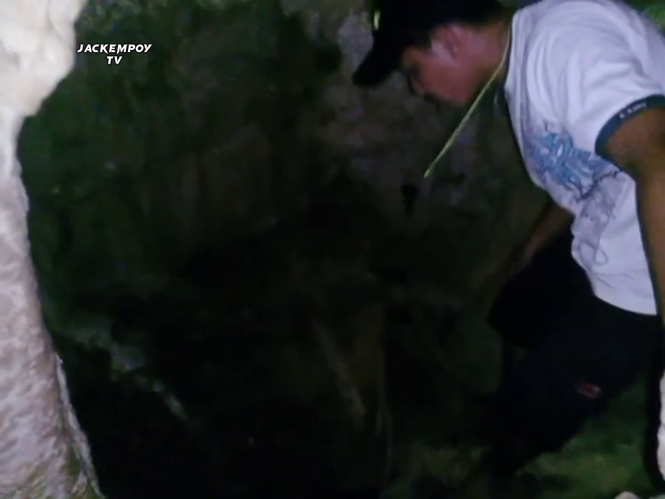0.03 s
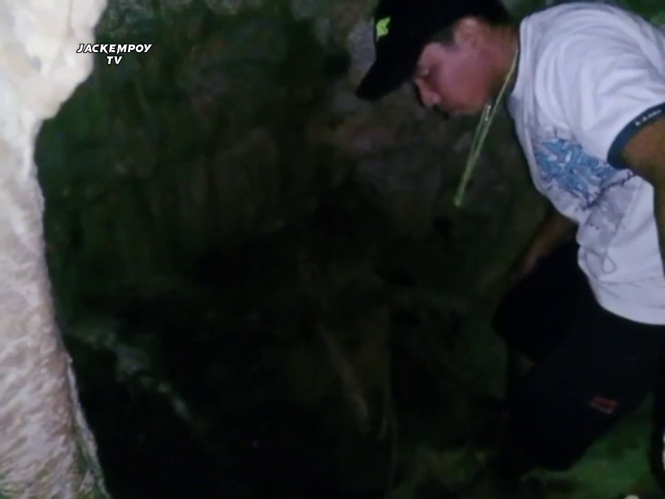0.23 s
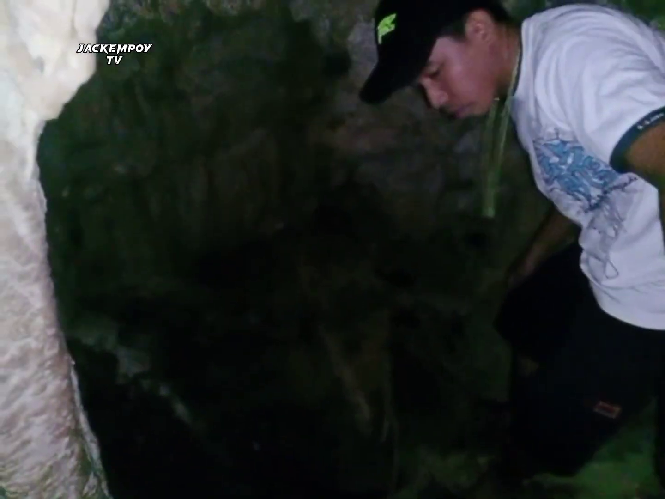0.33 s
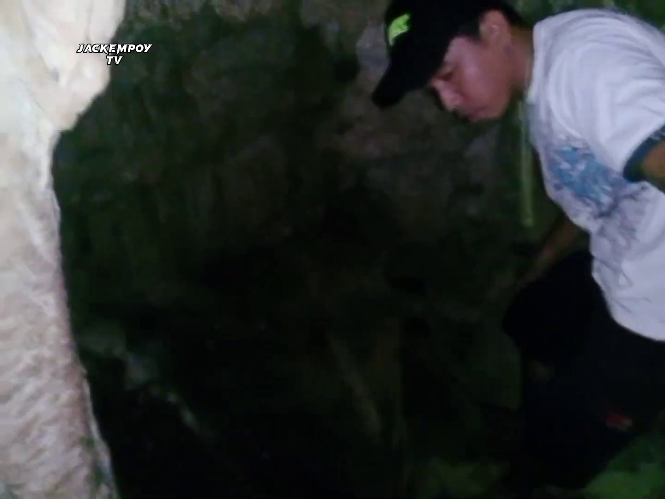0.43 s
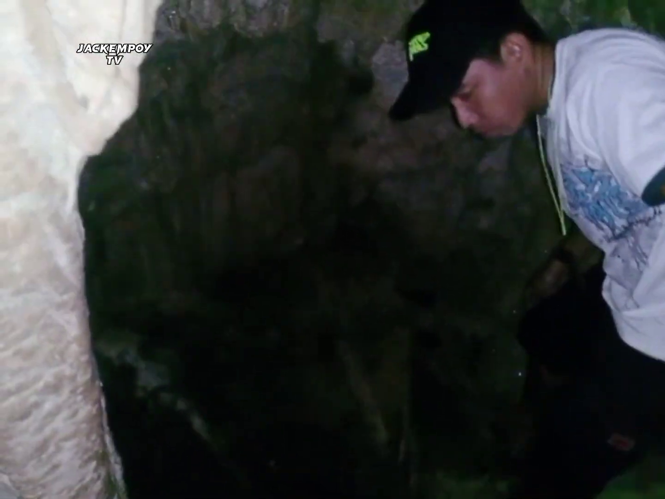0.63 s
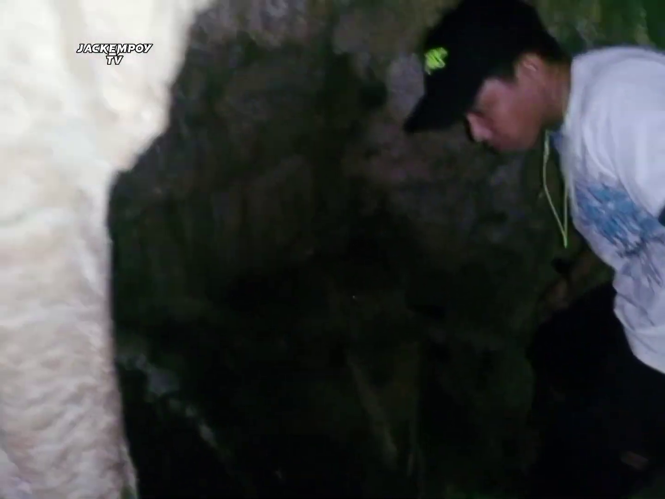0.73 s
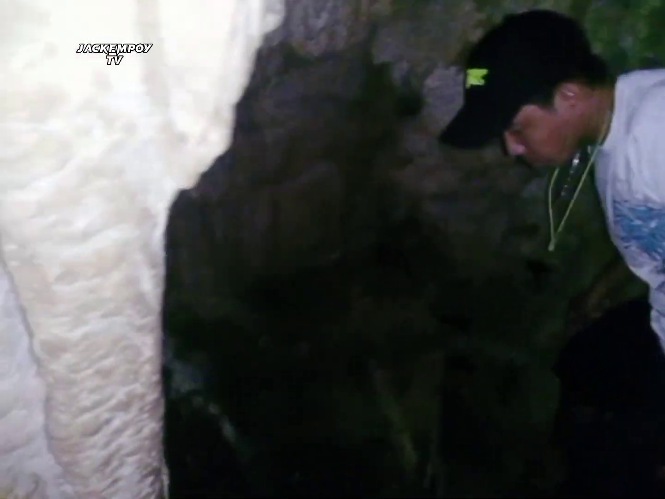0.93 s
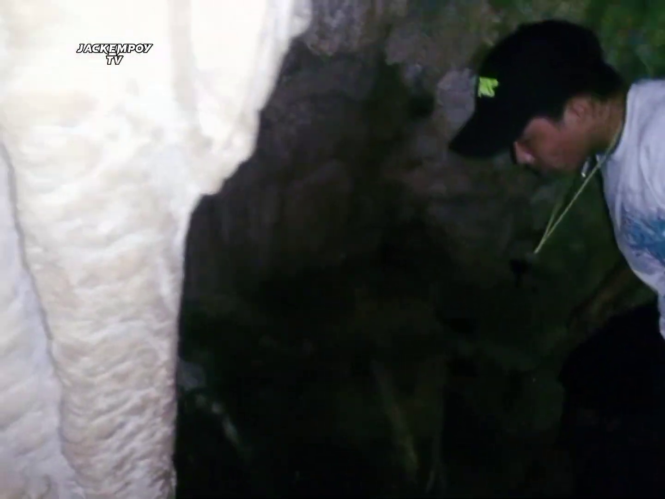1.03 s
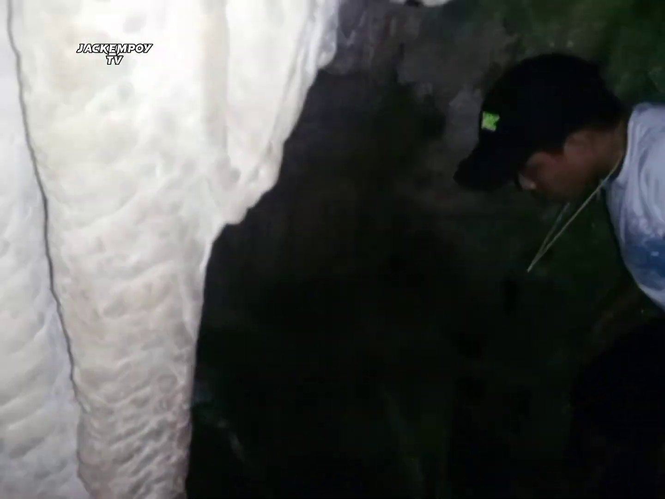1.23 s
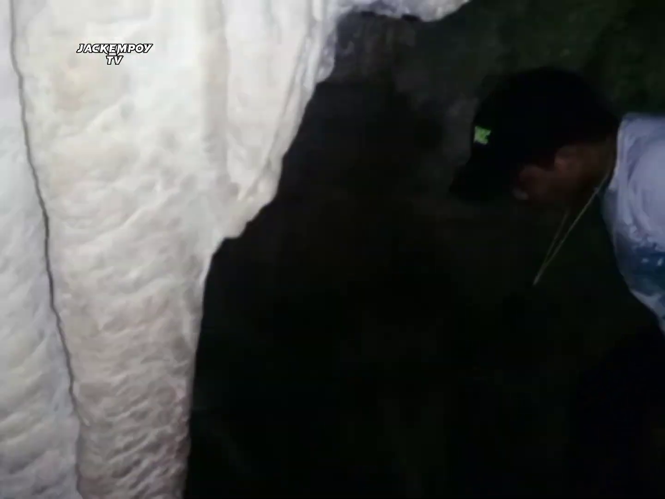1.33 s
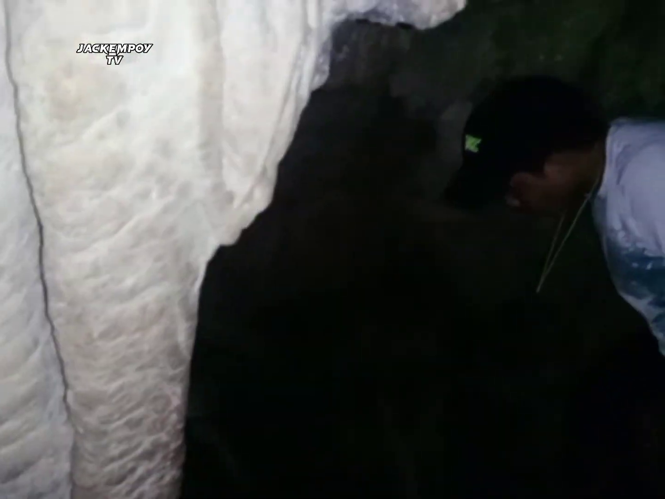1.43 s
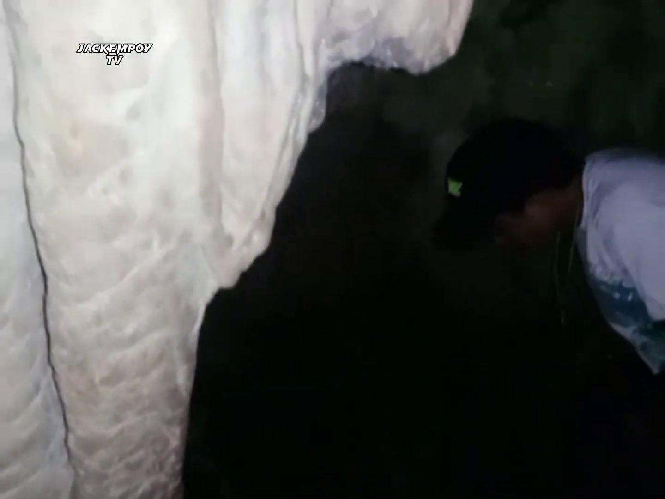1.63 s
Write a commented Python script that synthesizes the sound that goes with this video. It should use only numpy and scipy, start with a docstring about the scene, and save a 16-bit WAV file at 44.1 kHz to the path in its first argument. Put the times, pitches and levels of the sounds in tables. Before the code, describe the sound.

One dull bump booms hollowly with a short low rumble, then a few faint padded knocks follow. Throughout, a damp cave hisses steadily with distant running water and a shrill insect chorus.

```python
"""One dull bump sets a nearby hollow body booming until it is damped, with a short low rumble behind it.
A few faint, padded bumps follow. All around is the steady hiss of a damp cave: distant running water,
with a shrill chorus of insects and a thin, high hiss on top. The boom is a set of tones rung by soft
pushes; the water, insects, high hiss and rumble are shaped noise. The sound is mono."""
import sys
import numpy as np
from scipy import signal
from scipy.fft import irfft
from scipy.io import wavfile

SR = 44100
rng = np.random.default_rng(int(sys.argv[2]) if len(sys.argv) > 2 else 0)


def digitize_waveform(pressure):
    """Quantize a signal to 16-bit integers and store it at the path in sys.argv[1].

    Rows of a 2-D input are taken as channels; values are limited to [-1, 1].
    """
    field = np.atleast_2d(pressure).T
    bounded = np.clip(field, -1, 1)
    quanta = np.round(bounded * 32767).astype(np.int16)
    wavfile.write(sys.argv[1], SR, quanta)


N = 74970
T = np.arange(N) / SR

# The bump and its rebounds. Each row: time in seconds, strength in dB, contact time in seconds.
PUSHES = [(.233, 3, 0.00078), (.2526, -12, 0.00049), (.327, -14, 0.00092), (.372, -19, 0.00072)]
# The hollow body's tones. Each row: pitch in Hz, level in dB, seconds to fade by 60 dB.
BODY_TONES = [(81, -29, 2.2), (96.2, -46, .8), (127.4, -17.5, 0.43), (167, -29, 0.45), (194.7, -16.5, 0.63),
              (246, -14, 0.094), (268.2, -27.5, 0.78), (285.6, -12, 0.33), (327.6, -11.5, 0.27),
              (381, -3.5, 0.3), (385, -35, .84), (439, -20, 0.18), (520, -18, .12), (622, -17, .12)]
# The tone colour of the rumble. Each row: frequency in Hz, relative level in dB.
RUMBLE_COLOUR = [(40, -21), (70, -1), (130, 3), (200, 2.5), (250, -16), (320, -17.5), (500, -63)]
# The faint bumps. Each row: time of the peak in seconds, level in dB, pitch in Hz, swell in seconds.
FAINT_BUMPS = [(.748, -48.5, 134, .025), (.965, -49, 410, 0.0093), (1.207, -41.5, 148, .022),
               (1.455, -57, 132, 0.017)]
# The tone colour of the distant water. Each row: frequency in Hz, relative level in dB.
WATER_COLOUR = [(30, -23), (65, -17), (125, -5.5), (200, -4), (340, -10.5), (420, -6), (530, -10.5),
                (700, -12), (900, -8), (1150, -8), (1370, 0), (1580, -1), (2030, -4), (2500, -1.5),
                (3400, 0), (4200, 0.5), (5200, -4), (6150, -4.5), (7500, -9), (7680, -0.5), (8050, -8),
                (8650, -13), (9150, -23.5), (9800, -28), (10900, -27.5), (11350, -31), (12000, -37),
                (15500, -39)]
# The tone colour of the insect chorus. Each row: frequency in Hz, relative level in dB.
INSECT_COLOUR = [(6050, -54), (6220, -42), (6340, 2), (6600, 1.5), (6930, 0), (7200, -1), (7400, -12.5),
                 (7600, -34.5)]
# How the chorus swells and sinks. Each row: time in seconds, level in dB.
INSECT_SWELLS = [(0, -41), (.04, -44.5), (.18, -40.5), (.22, -44.5), (.34, -42), (.44, -41), (.48, -46),
                 (.6, -41.5), (.68, -43.5), (.87, -43), (.93, -45), (.98, -41.5), (1.07, -43),
                 (1.26, -44.5), (1.31, -41.5), (1.46, -43.5), (1.58, -41), (1.7, -42.5)]
# The tone colour of the highest hiss. Each row: frequency in Hz, relative level in dB.
HIGH_HISS_COLOUR = [(8800, -34), (9600, -6.5), (10900, -8), (11350, -14), (11700, -7), (12100, 0),
                    (12600, 1), (13300, -4), (14300, -7.5), (15500, -12)]
# Level of the highest hiss over time: the treble drops out briefly during the thump, and a short bright rustle
# flares # near 0.57 s. Each row: time in seconds, level in dB.
HIGH_HISS_LEVEL = [(0, -62.5), (.19, -60.5), (.26, -69), (.36, -73), (.41, -60), (.54, -61), (.565, -52.5),
                   (.64, -59), (.74, -59.5), (.8, -66), (.84, -59.5), (1.16, -60.5), (1.3, -62),
                   (1.41, -57.5), (1.5, -60.5), (1.7, -62)]


def thump():
    """A bump and its rebounds ring the hollow body, which is then damped; it gives off no deep bass."""
    damped_at_s, fade_db_per_s = 0.34, 290
    force = sum(soft_push(*row) for row in PUSHES)
    boom = sum(from_db(db) * ring(force, hz, fade_s) for hz, db, fade_s in BODY_TONES)
    damping = from_db(-fade_db_per_s * np.maximum(T - damped_at_s, 0))
    bass_cut = signal.butter(4, 78, "high", fs=SR, output="sos")  # weakens everything below 78 Hz
    return signal.sosfilt(bass_cut, boom * damping)


def soft_push(time_s, db, contact_s):
    """A force that rises and falls like a bell curve; the longer the contact, the duller the sound."""
    push = np.exp(-.5 * ((T - time_s) / contact_s) ** 2)
    return -from_db(db) * push / (push.sum() + 1e-20)


def ring(force, hz, fade_s):
    """One tone of the body: a push sets it swinging, and it dies away by 60 dB in fade_s seconds."""
    shrink = from_db(-60 / (fade_s * SR))  # share of the swing left after each sample
    angle = 2 * np.pi * hz / SR
    return signal.lfilter([.5, 0, -.5], [1, -2 * shrink * np.cos(angle), shrink ** 2], force + 1e-18)


def rumble():
    """A rough, low tail that trails the thump and stops short."""
    rise_s, fade_s = 0.058, 0.86
    hush_at_s, hush_db_per_s = 0.492, 600
    age = np.maximum(T - PUSHES[0][0], 0)
    tail = np.minimum(age / rise_s, 1) * from_db(-60 * age / fade_s)
    level_db = -31 - hush_db_per_s * np.maximum(T - hush_at_s, 0)
    return from_db(level_db) * tail * noise(RUMBLE_COLOUR)


def faint_bumps():
    """Faint, padded bumps: each is a low tone and a weaker, higher one that swell and fade together."""
    overtone_ratio, overtone_db = 1.625, -12.5
    bumps = np.zeros(N)
    for peak_s, db, hz, swell_s in FAINT_BUMPS:
        phase = 2 * np.pi * (hz * (T - peak_s) + rng.random())
        tone = np.sin(phase) + from_db(overtone_db) * np.sin(overtone_ratio * phase)
        swell = np.exp(-((T - peak_s) / swell_s) ** 2)
        bumps += from_db(db) * swell * tone
    return bumps


def water():
    """Distant running water, smoothed by the cave into an even hiss."""
    splits_hz = np.geomspace(200, 9000, 14)
    return from_db(-41) * noise(WATER_COLOUR, splits_hz, flicker_db=.5, per_second=6.5)


def insects():
    """Many insect voices blur into one shrill band that swells and rasps."""
    splits_hz = np.linspace(6450, 7200, 5)
    swell_db = np.interp(T, *np.transpose(INSECT_SWELLS))
    rasp_db = 0.9 * drift(per_second=150)
    return from_db(swell_db + rasp_db) * noise(INSECT_COLOUR, splits_hz, flicker_db=1.3, per_second=22)


def high_hiss():
    """The thin, highest hiss; the treble drops out briefly, and later a short bright rustle flares up within
    it."""
    level_db = np.interp(T, *np.transpose(HIGH_HISS_LEVEL))
    return from_db(level_db) * noise(HIGH_HISS_COLOUR, splits_hz=[11500], flicker_db=1.5, per_second=14)


def noise(colour, splits_hz=(), flicker_db=0, per_second=1):
    """Noise of a given tone colour and average size 1, split into bands that each flicker on their own."""
    hz = np.maximum(np.arange(N // 2 + 1) * SR / N, 1)
    points_hz, points_db = np.transpose(colour)
    gains = from_db(np.interp(np.log(hz), np.log(points_hz), points_db))
    spectrum = gains * np.exp(2j * np.pi * rng.random(len(hz)))  # random phases make it noise
    band = np.searchsorted(splits_hz, hz)
    sound = np.zeros(N)
    for k in range(len(splits_hz) + 1):
        flicker = from_db(flicker_db * drift(per_second))
        sound += irfft(spectrum * (band == k), N) * flicker
    return size_one(sound)


def drift(per_second):
    """A smooth random wander of average size 1; per_second sets how fast it moves."""
    step, warm_up = 40, 2000  # one point every 40 samples; the first 2000 points are dropped
    memory = np.exp(-2 * np.pi * step * per_second / SR)
    jitter = rng.standard_normal(N // step + warm_up + 2)
    slow = signal.lfilter([1], [1, -2 * memory, memory ** 2], jitter)[warm_up:]
    return np.interp(np.arange(N) / step, np.arange(len(slow)), size_one(slow - slow.mean()))


def size_one(x):
    """Scale a signal so that its average size (root mean square) is 1."""
    return x / np.sqrt(np.mean(x ** 2) + 1e-20)


def from_db(db):
    """Turn decibels into a number to multiply by."""
    return 10 ** (np.asarray(db) / 20)


def scene():
    """All the sources added up, the same in both channels."""
    background = water() + insects() + high_hiss()
    return np.tile(background + thump() + rumble() + faint_bumps(), (2, 1))


def record(dry):
    """Cut the treble steeply above 15500 Hz."""
    treble_cut = signal.ellip(12, .1, 80, 15500, fs=SR, output="sos")
    return signal.sosfilt(treble_cut, dry)


dry = scene()
out = record(dry)
digitize_waveform(out)
```